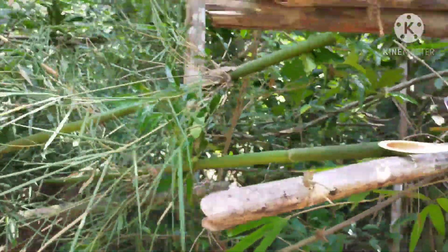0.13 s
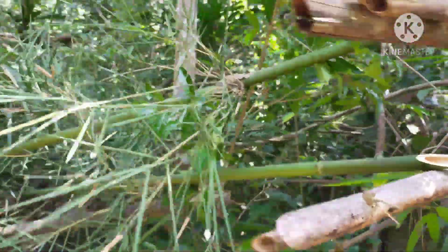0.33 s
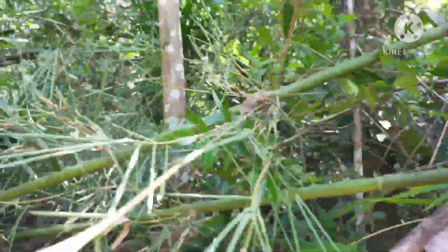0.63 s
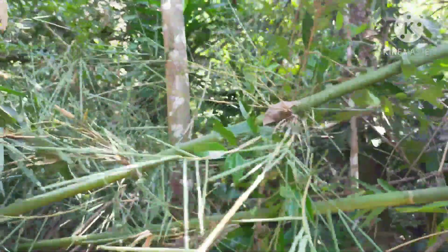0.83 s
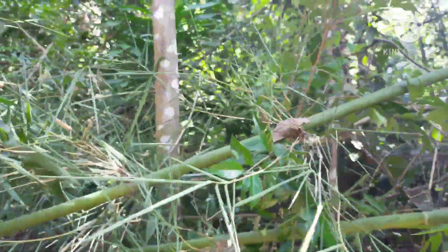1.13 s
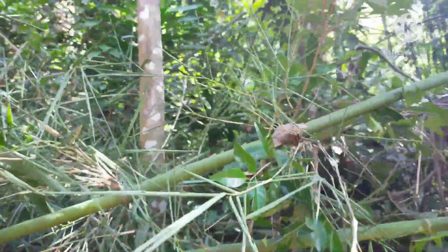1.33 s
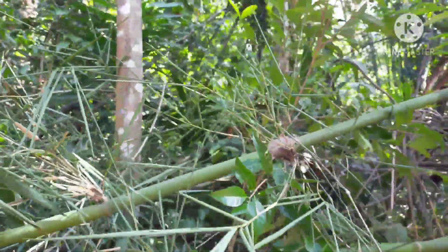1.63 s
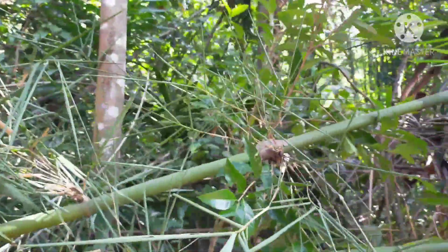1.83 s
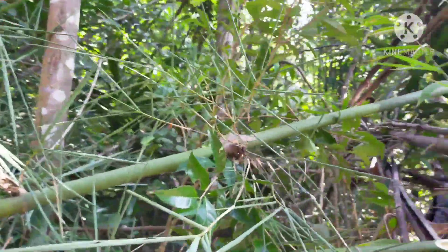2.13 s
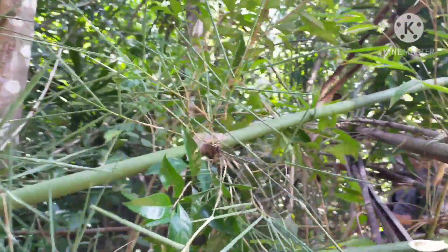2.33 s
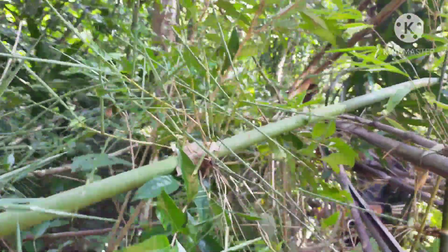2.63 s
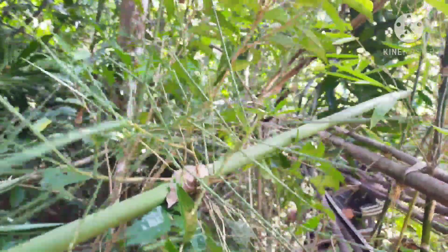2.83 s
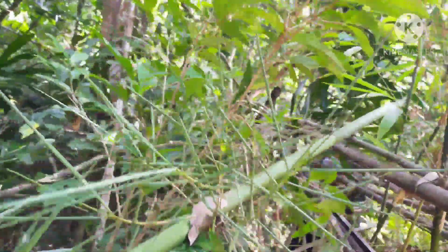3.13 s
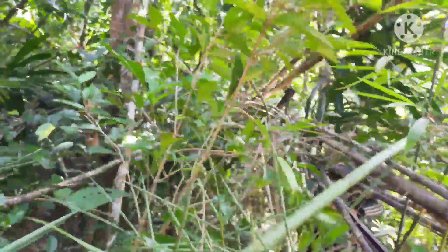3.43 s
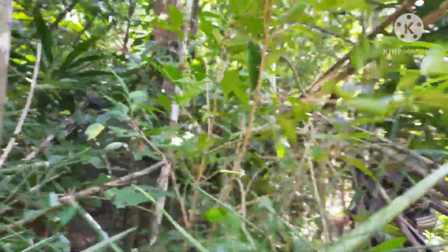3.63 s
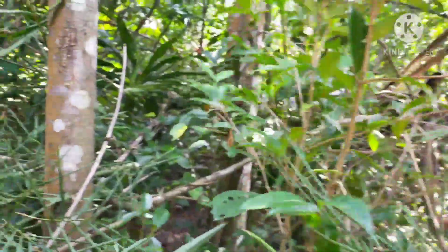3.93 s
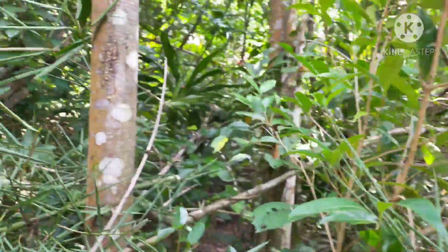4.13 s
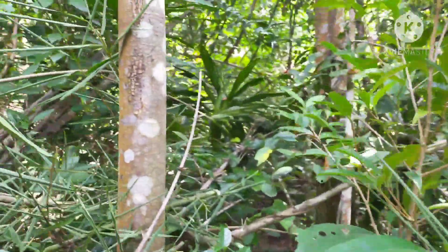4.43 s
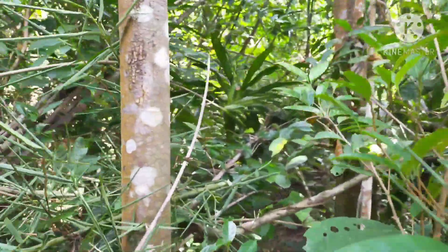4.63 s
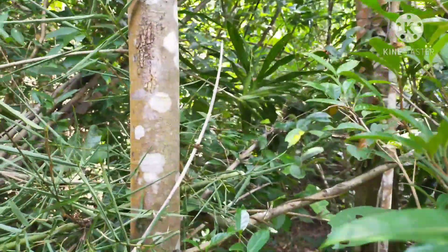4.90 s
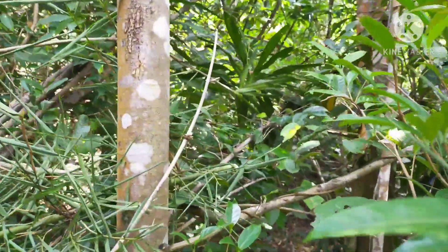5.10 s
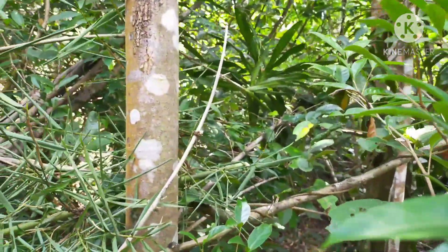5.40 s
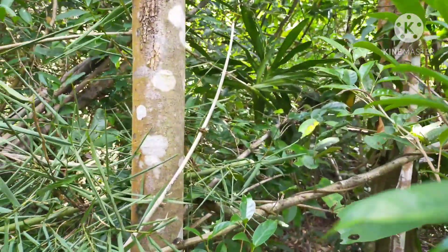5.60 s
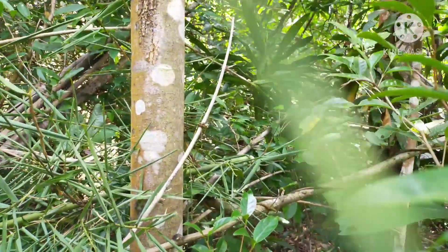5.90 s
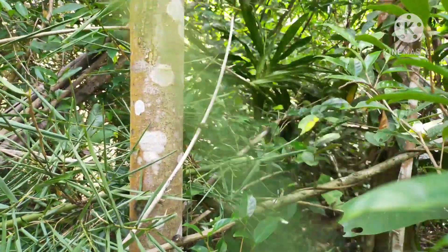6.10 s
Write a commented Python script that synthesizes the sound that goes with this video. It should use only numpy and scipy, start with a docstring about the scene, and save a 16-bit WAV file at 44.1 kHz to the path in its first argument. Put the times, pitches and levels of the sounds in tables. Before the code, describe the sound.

Close, dry forest rustling: a cluster of sharp cane cracks, then heavier leafy crunching, a brittle stick snap, and small leaf scrapes as it quiets.

```python
"""Dry stems and leaves crackle at once, in dense flurries, as someone pushes through bamboo undergrowth.
Each crackle is a shower of tiny random clicks, coloured by a filter and made louder by every push.
Canes split with a short ring and a tear of fibres, twigs and a stick snap, stems knock, leaf edges zip past.
The thicket adds short echoes; the hand-held microphone gets rumble and slow bumps.
Behind it all are filtered noise for air and insects, and one faint rising whistle from a far bird."""
import sys
import numpy as np
from scipy import signal
from scipy.fft import rfft, irfft
from scipy.io import wavfile

SR = 44100
rng = np.random.default_rng(int(sys.argv[2]) if len(sys.argv) > 2 else 0)


def digitize_waveform(pressure):
    """Quantize a signal to 16-bit integers and store it at the path in sys.argv[1].

    Rows of a 2-D input are taken as channels; values are limited to [-1, 1].
    """
    field = np.atleast_2d(pressure).T
    bounded = np.clip(field, -1, 1)
    quanta = np.round(bounded * 32767).astype(np.int16)
    wavfile.write(sys.argv[1], SR, quanta)


N = 275782
TIME = np.arange(N) / SR  # seconds

# pushes through the thicket: (time [s], lean-in [s], hold [s], stems [dB], leaves [dB])
THICKET_PUSHES = [(-.02, 0.016, 0.035, -47, -42), (.07, .12, 0.17, -53, -43), (.37, 0.09, .13, -54, -44),
                  (0.729, 0.065, 0.096, -55, -46), (0.985, 0.036, 0.16, -58, -51),
                  (1.238, 0.069, 0.042, -46.5, -47.5), (1.412, 0.042, 0.86, -64.5, -62.5),
                  (2.064, 0.14, .13, -38.5, -39), (2.488, 0.032, 0.11, -41.5, -42.5),
                  (2.624, 0.17, 0.49, -41.5, -35), (3.238, .18, 0.12, -32, -29.5),
                  (3.563, 0.11, 0.074, -32, -31), (3.85, 0.18, 0.28, -38.5, -39),
                  (4.328, 0.084, .19, -36, -32), (4.65, 0.079, 0.097, -44, -36.5),
                  (4.852, 0.053, 0.22, -47.5, -43.5), (5.125, 0.067, 0.019, -42, -28),
                  (5.272, 0.038, 0.068, -52.5, -36), (5.416, 0.066, .09, -48.5, -45),
                  (5.654, 0.029, 0.17, -59.5, -50), (5.864, 0.033, 0.062, -74, -70.5)]
# feet pressing into the ground litter: (time [s], length [s], peak level [dB])
FOOT_PRESSES = [(.43, .1, -62.5), (1.215, 0.2, -55), (2.08, 0.42, -47.5), (3.62, 0.16, -48.5)]
# bamboo canes splitting: (time [s], wood [dB], splinters [dB], cane ring [Hz], tearing time to fall 60 dB [s])
CANE_SPLITS = [(1.4247, -17.5, -24, 1980, 0.013), (1.437, -16.5, -19, 1620, 0.024),
               (1.446, -18, -14.5, 1505, 0.03), (1.523, -18.5, -21, 1620, 0.013),
               (1.529, -25.5, -19, 1640, 0.054), (1.54, -29, -24.5, 1820, 0.059),
               (1.606, -26, -23, 1560, 0.038), (3.44, -18.5, -22.5, 1760, 0.13),
               (4.596, -27, -24.5, 1700, 0.0079)]
# twigs cracking: (time [s], wood [dB], splinters [dB], tearing time to fall 60 dB [s])
TWIG_CRACKS = [(0.02, -36.5, -35, 0.11), (.271, -46, -38, 0.061), (.315, -51, -41, 0.029),
               (.842, -66, -36, 0.17), (1.147, -49, -45, 0.045), (1.271, -30.5, -36.5, 0.086),
               (1.317, -36, -45, 0.085), (1.416, -36, -44, 0.026), (1.566, -41.5, -29, 0.098),
               (2.339, -33, -36, 0.014), (2.591, -32, -38, 0.033), (2.828, -37, -30.5, 0.1),
               (3.464, -31, -23.5, 0.03), (3.761, -30.5, -25.5, 0.071), (3.779, -27, -21.5, 0.04),
               (3.821, -36, -25, 0.017), (3.896, -34, -23.5, 0.071), (4.215, -37.5, -26, 0.05),
               (4.728, -31, -33, 0.057), (5.129, -35.5, -39, 0.11), (5.202, -34.5, -37, 0.026),
               (5.899, -56, -37, 0.023), (5.918, -53, -37, .025), (6.03, -50.5, -38, 0.0022),
               (6.042, -65, -45.5, 0.0038), (6.146, -51.5, -44, .012), (6.195, -54, -45, 0.014)]
# a thin brittle stick snapping close by: (time [s], level [dB])
STICK_SNAPS = [(4.841, -36.5), (4.891, -45), (4.996, -17.5), (5.025, -31.5)]
# the notes inside each stick snap: (pitch [Hz], relative level [dB], time to fall 60 dB [s])
STICK_NOTES = [(2035, -19, 0.073), (2355, -9, 0.024), (2570, -13, 0.033), (4080, -23, 0.044),
               (7810, 3, 0.008), (8210, 3, 0.0096), (12100, -6, 0.011), (14500, -4.5, .014)]
# dull knocks of cane on cane: (time [s], level [dB], pitch [Hz])
CANE_KNOCKS = [(.462, -48.5, 1760), (0.477, -53.5, 228), (1.226, -50.5, 784), (1.269, -36, 1110),
               (1.304, -41.5, 1900), (1.348, -44.5, 1540), (2.051, -53.5, 1430), (2.064, -50, 1770),
               (2.144, -34.5, 1820), (3.446, -24.5, 1130), (3.448, -29, 1660), (4.135, -32.5, 2000),
               (4.389, -28.5, 1950), (4.599, -30, 2770)]
# leaf edges scraping past: (time [s], length [s], level [dB])
LEAF_RASPS = [(5.472, 0.018, -38.5), (5.502, 0.011, -42), (5.525, 0.028, -35), (5.563, 0.014, -40),
              (5.591, 0.022, -40.5), (5.701, 0.014, -33.5), (5.755, 0.016, -36), (5.812, 0.012, -37.5),
              (5.953, 0.013, -36.5)]
# bumps on the microphone: (time [s], swing size [dB], length [s])
MICROPHONE_BUMPS = [(1.719, -41.5, 0.061), (2.443, -31, 0.039), (2.745, -38, 0.044), (2.83, -30.5, .036),
                    (3.334, -36.5, 0.068), (3.577, -40, 0.066), (3.918, -29, 0.022), (4.053, -34, 0.049),
                    (4.347, -37.5, 0.058), (5.681, -45, 0.069)]

# colour of crackling ground litter: (frequency [Hz], density [dB per Hz])
LITTER_COLOUR = [(100, -41), (300, -11), (600, -4.5), (1000, 2.5), (1250, 2.5), (1800, -28.5)]
# colour of crackling stems: (frequency [Hz], density [dB per Hz])
STEM_COLOUR = [(800, -34.5), (1200, -13.5), (1440, -5), (1630, -6.5), (1800, -1.5), (2300, 1), (2700, -5),
               (3350, -9), (5000, -13), (6100, -13), (7200, -50), (8200, -22), (10000, -20.5)]
# colour of crackling leaves: (frequency [Hz], density [dB per Hz])
LEAF_COLOUR = [(3200, -15.5), (5000, -9.5), (5600, -8.5), (6100, -1.5), (7040, -4.5), (8160, 1),
               (9300, -10), (10800, -7.5), (13000, -1.5), (14800, 4.5), (15600, -1)]
# colour of tearing leaf sheaths: (frequency [Hz], density [dB per Hz])
SHEATH_COLOUR = [(1500, -35), (3000, -6), (4500, -6), (5400, -6), (6150, 7.5), (7000, -4.5), (9000, -15),
                 (15000, -19)]
# colour of breaking wood: (frequency [Hz], density [dB per Hz])
WOOD_COLOUR = [(100, -24), (450, -20), (750, -14.5), (1150, -11.5), (1350, -4.5), (1700, 0.5), (2400, 3),
               (3200, -11), (4300, -15), (6000, -40.5)]
# colour of flying splinters: (frequency [Hz], density [dB per Hz])
SPLINTER_COLOUR = [(2200, -14.5), (3600, -2.5), (4500, -2.5), (5200, -1.5), (6100, 4), (7000, 0), (8000, 6),
                   (9400, -5.5), (11000, -5), (13500, 4.5), (15000, 8), (15600, 5.5)]
# colour of the quiet forest air: (frequency [Hz], density [dB per Hz])
AIR_COLOUR = [(20, -3.5), (32, -3), (56, -6), (137, -15), (468, -20), (711, -17.5), (1330, -18),
              (2030, -9.5), (3510, -20.5), (6000, -30), (15000, -42)]
# colour of the insect hiss: (frequency [Hz], density [dB per Hz])
INSECT_COLOUR = [(4000, -25), (6200, -8), (7200, -3), (8300, -5), (10500, -16), (14400, -2), (15600, -2.5)]

# filters for the stick's crack, leaf edge, hand rumble, bump scuff and echoes: (frequency [Hz], gain [dB])
STICK_CRACK_COLOUR = [(100, -2.5), (400, -0.5), (900, 2.0), (15000, -0.5)]
LEAF_EDGE_COLOUR = [(1000, -22.5), (2200, -13.5), (5200, -25.5), (6200, -3.0), (7200, -7.5),
                    (8400, 5), (9600, -24.0), (12000, -19), (15000, -8.5)]
RUMBLE_COLOUR = [(20, 14.0), (55, -4.0), (100, -9), (180, -24.5), (400, -30), (1500, -55)]
SCUFF_COLOUR = [(30, -22), (90, 22.0), (140, 8), (220, -2.0), (400, -41), (1500, -62)]
ECHO_COLOUR = [(300, -6), (1400, -10), (2300, -0.5), (6000, 5), (15000, 6.5)]

# "T60" is the time a sound takes to fall by 60 dB
# foliage let go: most of the noise fades first, a little lingers while the branches settle
RELEASE_T60_S, SETTLE_DB, SETTLE_T60_S = 0.77, -22, 1.8
LITTER_BELOW_STEMS_DB = 14.5
# leaves sound brighter the more they outweigh the stems (dB of tilt per dB, about an even mix)
FINE_SLOPE, EVEN_MIX_DB = 0.15, 3.5
# stems catch and slip in clumps: new levels per second, and their spread
CLUMP_RATE, CLUMP_DB = 55, 1.8
# dry leaf sheaths: level at the hardest push, and dB lost per dB of easing off
TEAR_DB, TEAR_SLOPE = -34.5, 2.2
SWING_CYCLES = 1.72  # pressure swings in one bump
# the hand's rumble: at rest, and the shake each bump adds (relative to the bump)
HAND_REST_DB, SHAKE_DB, SHAKE_T60_S = -65, -11, 0.76
# the far bird's whistle
WHISTLE_AT_S, WHISTLE_LENGTH_S, WHISTLE_DB = 1.73, 0.2, -67
WHISTLE_HZ, WHISTLE_RISE_HZ_PER_S = 670, 1450
AIR_SWELL_DB = 1.6
TOP_HZ = 15600  # where the recorder cuts off


def rustle():
    """Litter, stems, leaves and sheaths crackle in shared flurries; a harder push breaks more a second."""
    stems_db, leaves_db = effort()
    easing_db = stems_db - stems_db.max()  # 0 at the hardest push
    litter_db = 20 * np.log10(np.hypot(undb(stems_db - LITTER_BELOW_STEMS_DB), tread()))
    clumped_stems_db = stems_db + CLUMP_DB * walk(CLUMP_RATE)
    sheaths_db = TEAR_DB + TEAR_SLOPE * easing_db
    fine_db = FINE_SLOPE * (leaves_db - stems_db - EVEN_MIX_DB)
    busy = undb(0.5 * easing_db)
    flurry = undb(0.83 * walk(130) + 0.53 * walk(25))
    # (most grains per second, strength spread [dB], colour, pivot [Hz], tilt [dB], level [dB])
    layers = [(2957, 2.4, LITTER_COLOUR, 170, 1.0 * walk(22), litter_db),
              (3555, 0.65, STEM_COLOUR, 2480, 1.86 * walk(35), clumped_stems_db),
              (18000, 2.9, LEAF_COLOUR, 10300, fine_db + 2.5 * walk(40), leaves_db),
              (2520, 3.8, SHEATH_COLOUR, 3700, 2 * walk(27), sheaths_db)]
    out = np.zeros(N)
    for rate, spread_db, spectrum, pivot_hz, tilt_db, db in layers:
        # dividing by sqrt(busy) keeps denser grains from also getting louder here
        crackle = colour(grains(rate * busy, spread_db) / np.sqrt(busy), spectrum)
        # thick and thin pieces take turns, so the colour see-saws about a pivot
        lowpass = signal.butter(2, pivot_hz, fs=SR, output="sos")
        thick = signal.sosfiltfilt(lowpass, crackle)
        thin = crackle - thick
        crackle = thick * undb(-tilt_db) + thin * undb(0.5 * tilt_db)
        out += unit(crackle * flurry) * undb(db)
    stalks = ticks(stems_db - 2.0, 1150, 2830, count=200)
    blades = ticks(leaves_db - 10.0, 2800, 10000, count=160)
    # the lower limit keeps leaf tips clicking faintly, so they never fall silent between pushes
    tips = ticks(np.clip(leaves_db + 5.0, -52, -31), 13900, 15800, count=160)
    return out + stalks + blades + tips + twiglets(stems_db, count=50)


def effort():
    """Levels (dB) of stems and leaves: every push leans in, holds, lets go and settles."""
    power = np.zeros((2, N)) + 1e-9  # a tiny floor, so the level in dB always exists
    for s, lean, hold, stems_db, leaves_db in THICKET_PUSHES:
        lean_in = np.clip((TIME - s) / lean, 0, 1)
        since = np.maximum(TIME - s - lean - hold, 0)
        let_go = fade(since, RELEASE_T60_S) + undb(SETTLE_DB) * fade(since, SETTLE_T60_S)
        power += np.outer(undb([stems_db, leaves_db]), lean_in * let_go) ** 2
    return 10 * np.log10(power)


def tread():
    """Loudness of the litter underfoot: each foot's weight swells and lifts."""
    out = np.zeros(N)
    for s, length, db in FOOT_PRESSES:
        out += undb(db) * np.sin(np.pi * np.clip((TIME - s) / length, 0, 1))
    return out


def ticks(level_db, lo_hz, hi_hz, count):
    """Single stalks and leaves click at random, each with its own pitch, following the given level."""
    out, t = np.zeros(N), TIME[:SR // 50]
    for when, pitch, size, damping in rng.random((count, 4)):
        at = when * TIME[-1]
        hz = min(lo_hz * (hi_hz / lo_hz) ** pitch, TOP_HZ)
        t60 = (6 + 18 * damping) / hz  # the ring lasts 6 to 24 cycles
        click = attack(highpass(ring(t, [(hz, 0, t60)]), 0.51 * hz))
        add(out, at, click * undb(level_db[int(at * SR)] - 16.7 * np.sqrt(size)))
    return out


def twiglets(level_db, count):
    """The thinnest twigs give way at random, following the level of the push that bends them."""
    out, t = np.zeros(N), TIME[:SR // 25]
    for when, wood, splinter in rng.random((count, 3)):
        at = when * TIME[-1]
        break_sound = snap(t, 2.5 - 12 * wood, 4.5 - 12 * splinter, 0.0098)
        add(out, at, undb(level_db[int(at * SR)]) * break_sound)
    return out


def canes():
    """Each split knocks the hollow cane into a short ring and sprays splinters."""
    out, t = np.zeros(N), TIME[:SR // 5]
    for s, wood_db, splinter_db, hz, t60 in CANE_SPLITS:
        modes = [(hz, 0, 0.015), (hz * 1.02, -6, 0.016), (2560, -4, 0.012), (3100, -9, 0.008)]
        knock = ring(t, modes) * (1 - fade(t, 0.053 * t60))  # a longer tear starts the ring more gently
        tube = attack(highpass(knock, 1260))
        tearing = attack(highpass(colour(fracture(t, t60, 0.71), WOOD_COLOUR), 440))
        splinters = attack(colour(fracture(t, t60, 0.65), SPLINTER_COLOUR))
        add(out, s, undb(wood_db) * attack(0.42 * tube + 0.36 * tearing))
        add(out, s, undb(splinter_db) * splinters)
    return out


def twigs():
    """The thicker twigs crack one by one, each with a woody click and a spit of splinters."""
    out, t = np.zeros(N), TIME[:SR // 6]
    for s, wood_db, splinter_db, t60 in TWIG_CRACKS:
        add(out, s, snap(t, wood_db, splinter_db, t60))
    return out


def snap(t, wood_db, splinter_db, t60):
    """A small break: a woody click and a bright spit of splinters."""
    click = attack(colour(fracture(t, t60, 1.0), WOOD_COLOUR))
    spit = attack(colour(fracture(t, t60, 0.49), SPLINTER_COLOUR))
    return undb(wood_db) * click + undb(splinter_db) * spit


def fracture(t, t60, first):
    """A sudden break, then a dying run of tearing fibres; the longer the tear, the softer it starts."""
    fibres = grains(9000, 4.1, size=len(t)) * fade(t, t60) * (1 - fade(t, 0.052 * t60))
    fibres /= np.linalg.norm(fibres)
    fibres[0] += first * fade(t60, 0.26)
    return fibres


def sticks():
    """A clean break rings the stick's own notes over a broad crack."""
    out, t = np.zeros(N), TIME[:SR // 10]
    for s, db in STICK_SNAPS:
        crack = attack(colour(fracture(t, 0.041, 0.84), STICK_CRACK_COLOUR))
        notes = ring(t, STICK_NOTES) * (1 - fade(t, 0.0039))
        notes = attack(highpass(notes, 910))
        add(out, s, undb(db) * attack(notes + undb(-9.0) * crack))
    return out


def knocks():
    """Stems bump each other with a short hollow tock: a break-like jolt sets two notes ringing."""
    out, t = np.zeros(N), TIME[:SR // 10]
    for s, db, hz in CANE_KNOCKS:
        hollow = ring(t, [(hz, 0, 0.012), (1.79 * hz, -14, 0.006)])
        tock = signal.fftconvolve(fracture(t, 0.047, 0.94), hollow)
        add(out, s, undb(db) * attack(highpass(tock, 0.5 * hz)))
    return out


def rasps():
    """A toothed leaf edge catches and slips in a brief high zip."""
    out, t = np.zeros(N), TIME[:SR // 20]
    for s, length, db in LEAF_RASPS:
        swell = np.sin(np.pi * np.minimum(t / length, 1))
        slips = colour(grains(4000, 3.2, size=len(t)) * swell, LEAF_EDGE_COLOUR)
        # the square root makes the level hold over the zip, not the whole buffer
        add(out, s, undb(db) * unit(slips) * np.sqrt(length / t[-1]))
    return out


def thicket(x, t60, wet_db):
    """Trunks and foliage scatter a short diffuse tail that holds little bass."""
    t = TIME[:SR // 2]
    tail = (fade(t, t60) + undb(-25) * fade(t, 0.79)) * (1 - fade(t, 0.0088))
    echoes = rng.standard_normal(len(t)) * tail
    echoes /= np.linalg.norm(echoes)
    echoes = colour(echoes, ECHO_COLOUR)
    return undb(wet_db) * signal.fftconvolve(x, echoes)[:N]


def bumps():
    """The hand rumbles on the microphone; a nudge swings the pressure, scuffs and leaves the hand shaking."""
    rumble = unit(colour(rng.standard_normal(N), RUMBLE_COLOUR))
    scuff = unit(colour(rng.standard_normal(N), SCUFF_COLOUR))
    out, shake = np.zeros(N), np.full(N, undb(HAND_REST_DB))
    for s, db, length in MICROPHONE_BUMPS:
        t = TIME[:int(length * SR)]
        swing = np.sin(2 * np.pi * SWING_CYCLES * t / length)
        # harder nudges drag the casing more
        drag = undb(db + 11.5) * scuff[int(s * SR):][:len(t)]
        add(out, s, undb(db) * np.hanning(len(t)) * (swing + drag))
        shaking = np.minimum(TIME / length, 1) * fade(TIME, SHAKE_T60_S)
        add(shake, s, undb(db + SHAKE_DB) * shaking)
    return out + rumble * shake * undb(2 * walk(12))


def bird():
    """One soft upward whistle: a sine whose pitch and loudness waver on the way through the trees."""
    since = np.clip(TIME - WHISTLE_AT_S, 0, WHISTLE_LENGTH_S)
    pitch_hz = (WHISTLE_HZ + WHISTLE_RISE_HZ_PER_S * since) * (1 + 0.0254 * walk(120))
    loudness = np.sin(np.pi * since / WHISTLE_LENGTH_S) * undb(WHISTLE_DB + 3.8 * walk(55))
    return loudness * np.sin(2 * np.pi * np.cumsum(pitch_hz) / SR)


def forest():
    """Quiet air and a gently wavering insect hiss, both made from filtered noise."""
    air = unit(colour(rng.standard_normal(N), AIR_COLOUR))
    insects = unit(colour(rng.standard_normal(N), INSECT_COLOUR))
    return air * undb(-59.0 + AIR_SWELL_DB * walk(2.05)) + insects * undb(-57.0 + 1.6 * walk(25))


def grains(rate, spread_db, size=N):
    """Tiny fractures at random moments, many weak and a few strong; rms 1."""
    strength = undb(spread_db * np.minimum(rng.exponential(size=size), 4))
    breaks = rng.random(size) < rate / SR
    return unit(breaks * rng.choice([-1, 1], size) * strength)


def ring(t, modes):
    """A struck body sounds several fading notes at once: (pitch [Hz], level [dB], T60 [s])."""
    return sum(undb(db) * np.sin(2 * np.pi * hz * t) * fade(t, t60) for hz, db, t60 in modes)


def fade(t, t60):
    """Falls 60 dB in t60 seconds."""
    return np.exp(-np.log(1000) * t / t60)


def walk(rate):
    """Random levels, rate of them a second, joined by slopes; rms 1."""
    return unit(np.interp(TIME * rate, np.arange(N), rng.standard_normal(N)))


def colour(x, points, size=4096):
    """Filters x through (frequency [Hz], gain [dB]) points, never sounding ahead of its input."""
    hz, db = np.transpose(points)
    bins_hz = np.arange(size // 2 + 1) * SR / size
    gain_db = np.interp(np.log(bins_hz + 1), np.log(hz), db)  # +1 avoids log of zero
    # folding the cepstrum forward gives a minimum-phase filter: its energy comes early
    cepstrum = irfft(np.log(undb(gain_db)))
    cepstrum[1:size // 2] *= 2
    cepstrum[size // 2 + 1:] = 0
    response = irfft(np.exp(rfft(cepstrum)))
    return signal.fftconvolve(x, response)[:len(x)]


def highpass(x, hz):
    """Thin bodies radiate little below hz."""
    return signal.sosfilt(signal.butter(3, hz, "high", fs=SR, output="sos"), x)


def undb(db):
    """Turns decibels into a plain multiplier."""
    return 10 ** (np.asarray(db) / 20)


def unit(x):
    """Scaled to rms 1."""
    return x / np.sqrt(np.mean(x ** 2))


def attack(x):
    """Scaled to rms 1 over the first 8 ms."""
    return x / np.sqrt(np.mean(x[:SR // 125] ** 2))


def add(out, s, x):
    """Mixes x into out, starting at s seconds."""
    i = max(int(s * SR), 0)
    out[i:i + len(x)] += x[:max(N - i, 0)]


def scene():
    """Adds the rustle, the breaks with their scattered echoes, the bumps and the background."""
    snaps = twigs() + sticks() + rasps() + knocks()
    splits = canes()
    scattered = thicket(snaps, 0.051, -19.5) + thicket(splits, 0.18, -9.5)
    return (rustle() + snaps + splits + scattered + bumps() + bird() + forest())[None]


def record(dry):
    """The recorder cuts the top steeply."""
    return signal.sosfilt(signal.ellip(10, 0.2, 70, TOP_HZ, fs=SR, output="sos"), dry)


dry = scene()
out = record(dry)
digitize_waveform(out)
```